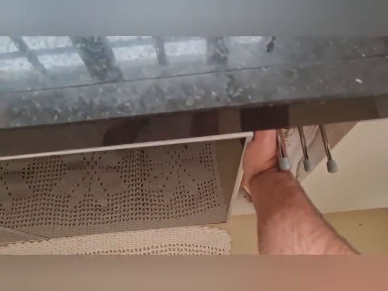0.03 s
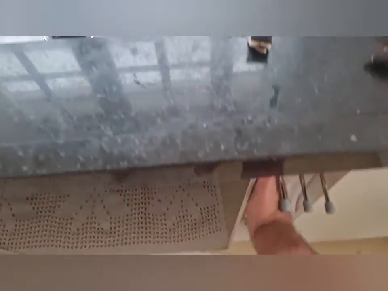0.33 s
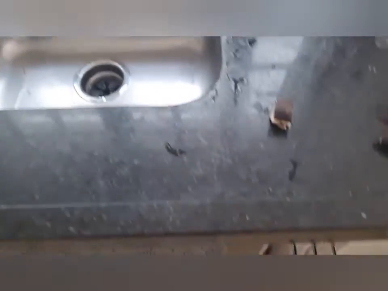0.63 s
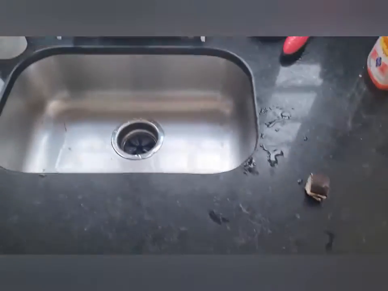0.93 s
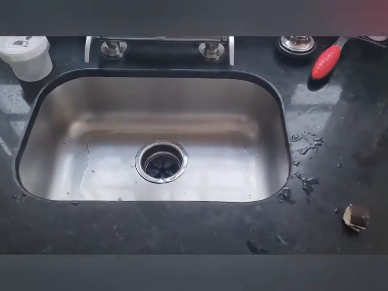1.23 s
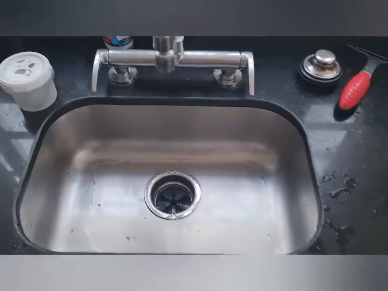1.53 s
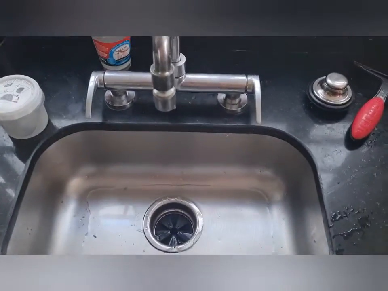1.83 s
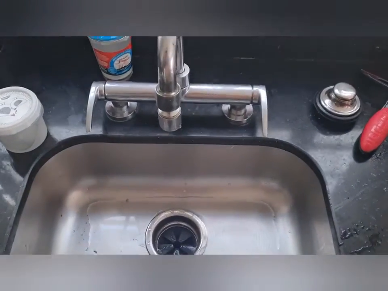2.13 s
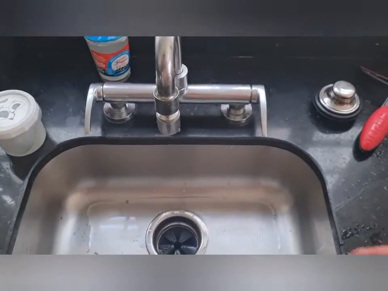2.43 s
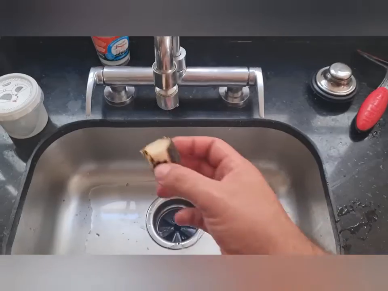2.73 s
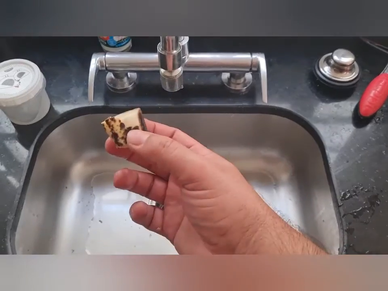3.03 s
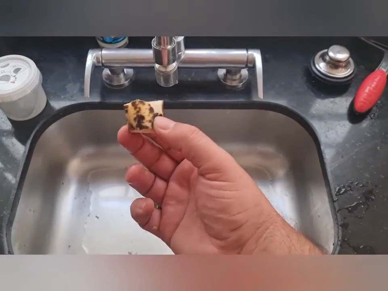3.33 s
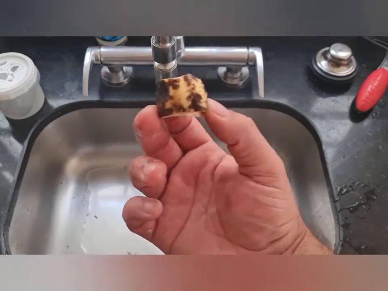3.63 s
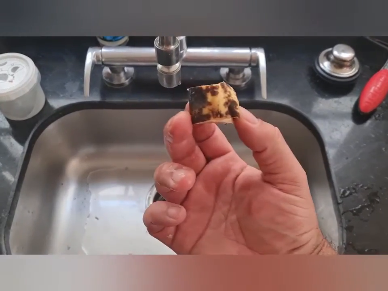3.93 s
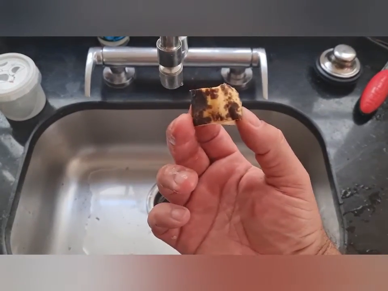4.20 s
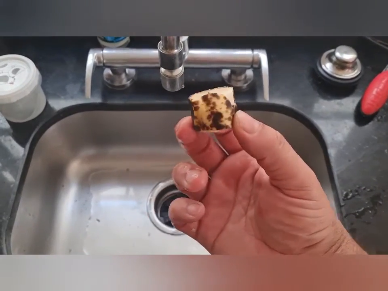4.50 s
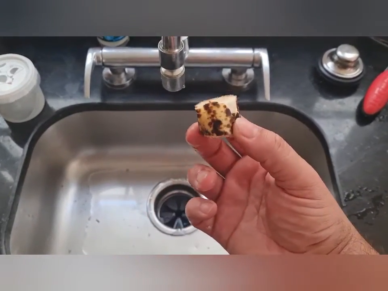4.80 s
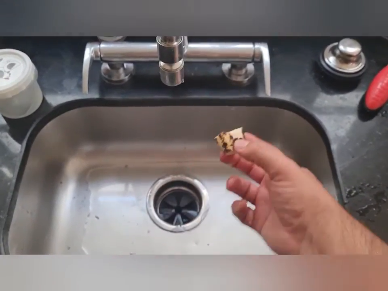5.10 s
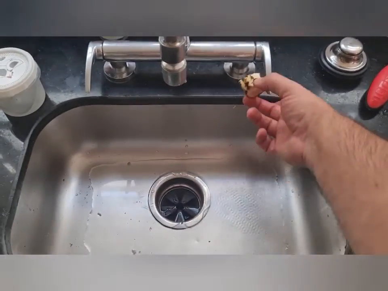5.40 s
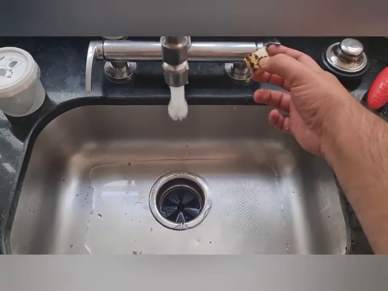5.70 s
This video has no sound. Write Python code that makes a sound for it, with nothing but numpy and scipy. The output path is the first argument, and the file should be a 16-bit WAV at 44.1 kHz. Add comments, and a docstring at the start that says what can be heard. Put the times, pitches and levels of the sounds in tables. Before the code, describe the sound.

In a quiet kitchen, a sink garbage disposal clicks on and jolts into motion with a short rattle. Its motor settles into an even hum and whir while water sloshes inside and droplets hiss through the drain, with light metallic scraping and occasional pings. The close microphone rises over the sink, making the sound clearer, and a soft splash of tap water arrives just at the end.

```python
"""Garbage disposal running empty but wet

Under a steel kitchen sink a switch ticks, and an induction motor shudders up to speed, humming at
twice the mains rate. Its turntable churns water, flings spray at the grinding chamber and scrapes
with a steely ring. The tone opens as the listener clears the rim; at the end tap water hits the basin."""
import sys
import numpy as np
from scipy.fft import rfft, irfft, next_fast_len
from scipy.io import wavfile
from scipy.ndimage import map_coordinates

SR = 44100
rng = np.random.default_rng(int(sys.argv[2]) if len(sys.argv) > 2 else 0)


def int16_out(signal):
    """Quantize to a 16-bit WAV file."""
    q = np.round(np.clip(np.atleast_2d(signal).T, -1, 1) * 32767)
    wavfile.write(sys.argv[1], SR, q.astype(np.int16))


N = 262395

# Room tone. Each row: frequency in Hz, relative level in dB.
ROOM_SPECTRUM = [(18, -56), (30, -10), (247, -4.5), (735, -28), (1780, -27), (2190, -26), (2700, -36),
                 (3980, -31), (15000, -50)]
# Stereo image in the basin. Each row: frequency in Hz, left-right likeness from -1 to 1.
STEREO_LIKENESS = [(60, 0.77), (330, 0.96), (520, 0.54), (950, 0.36), (1200, -0.057), (1700, 0.65),
                   (2100, -0.55), (2750, 0.15), (3100, 0.46), (3900, 0.41), (5050, 0.34), (5500, 0.3),
                   (7200, -0.35), (12500, -0.1), (15000, 0.11)]
# Short echoes that tie left and right together, for a less diffuse sound. Each entry: delay in seconds.
SIDE_ECHOES_S = [.00025, .00055, .0009, .0013, .0017, .0022]
# Colour of both the tap's splash and the switch's tick. Each row: frequency in Hz, relative level in dB.
SPLASH_SPECTRUM = [(25, -18), (70, 5), (300, 1), (900, -5), (1700, -23), (2150, -7), (3100, -2), (3700, -8),
                   (4400, 4), (5200, -1.5), (7000, -1), (8500, -5), (11500, -7), (16000, -18)]

MAINS_HZ, SHAFT_HZ, SWITCH_ON_S = 60.04, 29.25, .075
SHUDDER_AT_S, SHUDDER_RISE_DB_PER_S = 0.27, 139  # the shaking peaks just before full speed
# Magnetic hum, before the starting surge and sag. Each row: time in seconds, level in dB.
HUM_LEVELS = [(0.55, -23), (1.01, -22.5), (1.11, -25), (1.29, -21.5), (1.34, -22), (2.06, -19), (2.14, -18),
              (2.37, -20), (2.48, -19.5), (3.0, -20), (5.46, -19), (5.6, -20.5), (5.78, -18), (5.87, -19)]
# Stator buzz under the starting current. Each row: multiple of the hum's pitch, level in dB.
BUZZ_HARMONICS = [(3, -43), (5, -55), (6, -54)]
# Rotor unbalance tones. Each row: multiple of the shaft rate, level in dB.
SHAFT_TONES = [(2, -60.5), (6, -50), (9, -49), (12, -55)]
# Rattle of the mount. Each row: frequency in Hz, relative level in dB.
MOUNT_SPECTRUM = [(120, 1), (200, 12.5), (633, 1.5), (726, 5), (851, -5), (1060, -43), (1330, -2),
                  (1840, -11), (2500, -18), (3250, -66), (5500, -120)]
# Lugs flying out. Each row: start in seconds, level in dB, pitch in Hz, seconds to fall 60 dB.
LUG_KNOCKS = [(.165, -31, 322, 0.11), (.177, -33, 1306, 0.14), (0.208, -24, 1280, 0.1),
              (0.23, -17, 195, 0.039), (.238, -23.5, 555, 0.14), (.265, -28.5, 830, 0.11),
              (.268, -32, 1337, 0.1), (.291, -27, 600, 0.073)]
# Low ring of the basin. Each row: frequency in Hz, width in Hz, relative level in dB.
BASIN_MODES = [(349, 15, 1), (495, 13, 1), (567, 6.3, 3), (597, 5.2, 3), (726, 29, 6.5), (838, 47, 2)]

WET_AT_S, WET_RISE_S = .12, 0.15  # the turntable picks up the water
RIM_FROM_S, OVER_SINK_S = 1, 1.78  # the listener clears the rim
# Churning water. Each row: frequency in Hz, relative level in dB.
CHURN_SPECTRUM = [(20, -31), (45, -10), (80, -5), (130, 7), (200, 0.5), (260, 1.5), (350, -4), (430, -12),
                  (620, -18), (850, -14), (1400, -11.5), (2100, -18.5), (4000, -54)]
# Colour of the drumming: a dip at 2.1-2.5 kHz, a lift at 2.7 kHz. Each row: frequency in Hz, gain in dB.
DRUMMING_EQ = [(1880, 0), (2080, -6.5), (2450, -3), (2700, 6), (3550, -2.5), (3900, 0.5), (4200, -0.5)]
# Grinding chamber resonances. Each row: frequency in Hz, width in Hz, relative level in dB from above
# the sink, and from behind its rim.
CHAMBER_MODES = [(768, 26, -23.5, -4), (875, 23, -22, 1), (1010, 17, 0.5, -6), (1104, 17, 6.5, 1),
                 (1159, 29, 4, 5), (1221, 30, 2.5, 7), (1344, 43, -26, 6), (1440, 31, -0.5, 4.5),
                 (1685, 23, 4.5, 10.5), (1737.7, 28, 8, 7.5), (1771, 16, 5, 8), (1870, 14, -2, 5),
                 (2727, 130, -9.5, -7.5), (3083, 52, 1, -2.5), (3174, 67, -3, -12), (3436, 124, -6.5, -19),
                 (3670, 110, -11.5, -19), (4230, 186, -3, -7)]
# Turntable resonances, lowest first. Each row: frequency in Hz, width in Hz, relative level in dB from
# above the sink, and from behind its rim.
STEEL_MODES = [(5066, 62, 12.5, 5), (5180, 49, -1, 0), (5290, 38, 3, -12), (5410, 41, -6, -9),
               (5685, 44, -16, -8), (6030, 85, -1, -14), (6500, 63, -3.5, -3), (7240, 130, -17, -5)]
# Ring of the rubbing steel, before the rim shades it. Each row: time in seconds, level in dB.
RING_LEVELS = [(.2, -45), (.8, -31.5), (1.2, -32.5), (1.62, -39.5), (1.8, -36), (2.3, -37.5), (2.7, -34),
               (3.15, -38.5), (3.9, -34.5), (4.4, -36.5), (4.9, -34.5), (5.95, -37.5)]
# The steel catches and pings. Each row: time in seconds, level in dB.
STEEL_CATCHES = [(2.19, -34), (2.735, -33), (3.031, -27.5), (3.865, -28), (3.965, -30), (4.96, -28)]
# Broader rasp of wet steel. Each row: time in seconds, level in dB.
RASP_LEVELS = [(.2, -71), (.7, -54), (1.2, -62), (1.6, -51), (1.9, -43), (2.3, -37.5), (2.75, -45),
               (2.95, -51), (3.6, -88), (4.4, -42.5), (5.1, -42), (5.95, -43)]
# Colour of that rasp. Each row: frequency in Hz, relative level in dB.
RASP_SPECTRUM = [(4800, -56), (5150, -11), (5330, -1), (5480, 0.5), (5750, -11), (6600, -40)]

DROPS_PER_S, DROP_WASH = 9000, 1.1
# Spray at the drain. Each row: time in seconds, relative level in dB, left minus right in dB.
SPRAY_LEVELS = [(.2, -32, 12), (.3, -40, 11.5), (.35, -33.5, 11), (.68, -37, 10), (.87, -35.5, 8),
                (1.65, -34, 5.5), (1.8, -34.5, 5.5), (2.25, -34, 4.5), (2.42, -36, 6), (3, -34.5, 6.5),
                (4.8, -35.5, 7.5), (5.3, -34.5, 4), (5.6, -32.5, 3.5), (5.9, -34, 2.5)]
# Spurts through the drain. Each row: time in seconds, boost in dB.
SPRAY_SPURTS = [(1.93, 2), (3.165, 6), (4.91, -3), (5.57, 3)]
# Hiss of the droplets. Each row: frequency in Hz, relative level in dB.
MIST_SPECTRUM = [(1500, -49), (2400, -7.5), (3500, -5.5), (3850, -5), (4300, 3.5), (4800, -9), (5300, 7),
                 (6700, 7.5), (7350, 10), (8000, 4), (8350, -2.5), (9200, 7), (10050, 2.5), (10650, 8.5),
                 (11500, 3.5), (12300, 6), (13100, 0.5), (15700, 0.5)]
# The listener's move to the sink. Each row: time in seconds, nearness from 0 to 1.
NEARNESS = [(.3, 0.01), (2.3, 0.97), (5.95, .95)]
# Echoes off the drain's collar, left list then right. Each row: delay in ms from afar, and over the sink.
COLLAR_ECHOES = [
    [(.719, .652), (1, .536), (0.14, 0.62)],
    [(1.2, 1), (4, 0.55), (0.56, 0.24)],
]
# Sliding bands of hiss. Each row: starting frequency in Hz, width in Hz, relative level in dB.
HISS_BANDS = [(6280, 270, 5), (8240, 170, 1), (10900, 400, -2)]
# Gulps of water. Each row: time in seconds, level in dB, pitch in Hz, boost to the wall's drumming in dB.
WATER_GULPS = [(.32, -28, 165, -3), (1.1, -33, 172, 1), (1.78, -34.5, 262, 1), (2.14, -39, 253.5, 1),
               (2.52, -43, 262, 0.5), (2.64, -39, 149.5, 0.5), (4.125, -36.5, 184, 1),
               (5.04, -36, 255.7, 0), (5.17, -34.5, 176, -1)]
GULP_HALF_S = 0.036


def amp(db):
    """Decibels to gain."""
    return 10 ** (np.asarray(db) / 20)


def along(points, hz):
    """Read (Hz, value) points on a log frequency axis."""
    freqs, values = np.transpose(points)
    return np.interp(np.log(hz + 1), np.log(freqs + 1), values)


def clock():
    """The time of every sample, in seconds."""
    return np.arange(N) / SR


def curves(rows):
    """An automation curve for each column after the time."""
    times, *columns = np.transpose(rows)
    return [np.interp(clock(), times, column) for column in columns]


def before_after(s):
    """Seconds still to go until s, and seconds gone since."""
    return np.maximum(s - clock(), 0), np.maximum(clock() - s, 0)


def ramp(rise_s, start=SWITCH_ON_S):
    """0 before the start, 1 after rise_s seconds."""
    return np.clip((clock() - start) / rise_s, 0, 1)


def swell(s, half_s):
    """A smooth bump of height 1 at time s."""
    return np.exp(-np.minimum(((clock() - s) / half_s) ** 2, 20))


def burst(start, rise_s, db, fall_db_per_s):
    """An envelope with a quick attack and a steady decay."""
    return amp(db - fall_db_per_s * before_after(start)[1]) * ramp(rise_s, start)


def wobble(rate):
    """A smooth random curve, rate knots a second."""
    return map_coordinates(rng.standard_normal(int(N * rate / SR) + 4), [clock() * rate])


def noise():
    """Two unrelated white noises."""
    return rng.standard_normal((2, N))


def impacts(rate, wash):
    """Tiny random hits, rate a second, on a wash of countless smaller ones."""
    hits = noise() * (rng.random(N) < rate / SR)
    return hits / np.sqrt(np.mean(hits ** 2) + 1e-20) + wash * noise()


def filtered(x, response):
    """Pass x through a frequency response."""
    size = next_fast_len(N + SR // 2)
    return irfft(rfft(x, size) * response(np.fft.rfftfreq(size, 1 / SR)), size)[..., :N]


def shape(spectrum):
    """The response of a broad EQ curve."""
    return lambda hz: amp(along(spectrum, hz))


def body(modes):
    """The response of a set of resonances."""
    return lambda f: sum(amp(db) * 1j * f * width / (hz * hz - f * f + 1j * f * width)
                         for hz, width, db in modes)


def delayed(x, lag_s):
    """x heard a changing number of seconds later."""
    return x[np.clip(np.arange(N) - np.round(lag_s * SR).astype(int), 0, N - 1)]


def panned(pair, left_db):
    """Lean a pair to the left, keeping its mean gain."""
    ratio = amp(left_db)
    return np.array([pair[0] * ratio, pair[1]]) * 2 / (1 + ratio)


def in_basin(pair, response):
    """Colour two unrelated drives and mix them as the basin's reflections do; the middle has rms 1."""
    size = next_fast_len(N + SR // 2, real=True)
    hz = np.fft.rfftfreq(size, 1 / SR)
    first, second = rfft(pair, size) * response(hz)
    spread = np.arccos(np.clip(along(STEREO_LIKENESS, hz), -1, 1)) / 2
    # part of the side signal is the middle, arriving by short echoes
    shared = 0.83 * np.tanh(sum(np.sin(2 * np.pi * hz * s) for s in SIDE_ECHOES_S))
    echoed = 1j * shared * first + np.sqrt(1 - shared ** 2) * second
    mid, side = irfft(np.array([first * np.cos(spread), echoed * np.sin(spread)]), size)[:, :N]
    return np.array([mid + side, mid - side]) / np.std(mid)


def shade():
    """1 while the rim hides the drain, 0 once the listener is over the sink."""
    return 1 - ramp(OVER_SINK_S - RIM_FROM_S, RIM_FROM_S)


def past_rim(drive, modes, response):
    """Drive a set of modes whose balance changes as the listener clears the rim."""
    above = in_basin(drive, response([(hz, width, db) for hz, width, db, _ in modes]))
    behind = in_basin(drive, response([(hz, width, db) for hz, width, _, db in modes]))
    return above + shade() * (behind - above)


def kitchen():
    """A quiet, low bed of room tone."""
    return amp(-52) * in_basin(noise(), shape(ROOM_SPECTRUM))


def switch():
    """The contacts close with a faint tick."""
    tick = burst(start=0.071, rise_s=.002, db=-62, fall_db_per_s=201)
    return tick * in_basin(noise(), shape(SPLASH_SPECTRUM))


def shaft_angle():
    """The rotor reaches speed in about a quarter second, then wavers with the drag of the water."""
    speed_hz = SHAFT_HZ * ramp(0.27) * (1 + 0.0027 * wobble(5))
    return 2 * np.pi * np.cumsum(speed_hz) / SR


def motor(angle):
    """The stator pulls twice per mains cycle, hardest while starting; unbalance adds weak shaft tones."""
    hum_db, = curves(HUM_LEVELS)
    # the hum sags under the shudder, peaks as the rotor reaches speed, and settles
    sag_db = 5 * swell(0.264, half_s=0.022)
    before, after = before_after(0.33)
    surge_db = 9 * np.maximum(1 - before / 0.32 - after / 0.22, 0)
    stereo_phase = np.outer([.5, -.5], .15 * (1 + 0.095 * wobble(1.3)))  # sides slightly out of step
    pull = 2 * np.pi * 2 * MAINS_HZ * clock() + 0.075 * wobble(27) + stereo_phase
    hum_gain = amp(hum_db + surge_db - sag_db + 0.42 * wobble(30)) * ramp(0.11)
    hum = hum_gain * (np.sin(pull) + amp(-35) * np.sin(2 * pull))
    tones = sum(amp(db + 3.2 * wobble(12)) * np.sin(k * angle + 0.8 * wobble(9)) for k, db in SHAFT_TONES)
    buzz = sum(amp(db + 1.7 * wobble(21)) * np.sin(k * pull) for k, db in BUZZ_HARMONICS)
    starting = ramp(0.033) * (1 - ramp(0.083, SHUDDER_AT_S))
    return panned(np.sqrt(2) * (hum + buzz * starting + tones * ramp(0.97)), left_db=-.5)


def shudder(hold_s=.055, peak_db=-29.5, first_shake_db=-43.5, fall_db_per_s=190):
    """Starting torque shakes the mount from the moment the switch closes, holding its peak briefly."""
    before, after = np.maximum(np.array(before_after(SHUDDER_AT_S)) - hold_s / 2, 0)
    build_db = np.maximum(peak_db - SHUDDER_RISE_DB_PER_S * before, first_shake_db)
    shake = amp(build_db - fall_db_per_s * after) * ramp(.02)
    return shake * in_basin(impacts(rate=490, wash=0.99), shape(MOUNT_SPECTRUM))


def basin(jolt_db=27, fall_db_per_s=81):
    """The start jolts the steel basin, and the motor's shaking keeps it ringing faintly."""
    before, after = before_after(SHUDDER_AT_S)
    jolt = amp(jolt_db - SHUDDER_RISE_DB_PER_S * before - fall_db_per_s * after)
    return amp(-64) * (1 + jolt) * in_basin(noise(), body(BASIN_MODES)) * ramp(0.15)


def chamber(angle, slosh):
    """Water churns low in the housing and drums on its wall as each of two lugs sweeps by."""
    hum_db, = curves(HUM_LEVELS)
    swell_db = hum_db - np.median(hum_db)  # both layers partly ride the hum's level
    turbulence = noise() * amp(3.3 * np.tanh(wobble(20)))
    churn = amp(-40 + 0.58 * swell_db) * in_basin(turbulence, shape(CHURN_SPECTRUM))
    slap_db = sum(db * swell(s, GULP_HALF_S) for s, _, _, db in WATER_GULPS)
    drops = impacts(rate=3500, wash=0.96)
    force = amp(slap_db + 0.5 * slosh + np.sin(2 * angle) + 1.8 * wobble(70))
    drumming = filtered(drops * force, shape(DRUMMING_EQ))
    whir = amp(-38 + 0.59 * swell_db) * past_rim(drumming, CHAMBER_MODES, body)
    return panned(churn, left_db=-1.5) + whir


def plate(modes, cutoff_hz=4985):
    """The response of a steel plate, which hardly radiates below its first mode."""
    return lambda hz: body(modes)(hz) / np.sqrt(1 + (cutoff_hz / np.maximum(hz, cutoff_hz / 2)) ** 70)


def scrape(slosh, rim_loss_db=10):
    """Steel rubs in uneven bursts: the turntable rings, pings where it catches, and rasps."""
    ring_db, = curves(RING_LEVELS)
    rasp_db, = curves(RASP_LEVELS)
    pressure = amp(0.5 * slosh + 0.95 * wobble(45) + 0.58 * wobble(180))
    ring = past_rim(impacts(rate=2600, wash=0.64) * pressure, STEEL_MODES, plate)
    playhead = np.arange(N) + .00003 * SR * wobble(22)  # the pitch wavers
    ring = np.array([map_coordinates(side, [playhead]) for side in ring])
    ring *= amp(ring_db - rim_loss_db * shade())
    catches = sum(amp(db) * swell(s, half_s=0.0079) for s, db in STEEL_CATCHES)
    pings = np.sqrt(2) * catches * np.sin(2 * np.pi * STEEL_MODES[0][0] * playhead / SR)
    rasp = amp(rasp_db) * in_basin(impacts(rate=1600, wash=0.68) * pressure, shape(RASP_SPECTRUM))
    return panned(ring + pings + rasp, left_db=11)


def reflected(pair, count, longest_s=.006, drift_s=.00008):
    """Short echoes shift as the listener nears, sweeping the colour of the hiss; wall echoes drift."""
    nearness, = curves(NEARNESS)
    out = []
    for side, echoes in zip(pair, COLLAR_ECHOES):
        collar = sum(delayed(side, (far + (near - far) * nearness) / 1000) for far, near in echoes)
        wall_lags = rng.uniform(longest_s / 10, longest_s, count)
        walls = sum(delayed(side, s + drift_s * wobble(1.2)) for s in wall_lags)
        out.append(side + amp(-15) * collar + amp(-7.5) * walls)
    return np.array(out) * np.std(pair) / np.std(out)


def spray(angle, slosh):
    """Flung droplets hiss through the drain; the middle of the hiss leans furthest left."""
    spray_db, left_db = curves(SPRAY_LEVELS)
    spurt_db = sum(db * swell(s, half_s=0.0063) for s, db in SPRAY_SPURTS)
    throw = amp(spurt_db + 0.55 * slosh + 0.15 * np.sin(angle) + 1.44 * wobble(150))
    mist = in_basin(impacts(DROPS_PER_S, DROP_WASH) * throw, shape(MIST_SPECTRUM))
    mist = amp(spray_db - 1.45) * reflected(mist, count=6)
    # Each row: frequency in Hz, extra left minus right in dB.
    lean = [(2500, -17), (4300, 1.5), (7200, 1.5), (9500, -3.0), (11000, -3.5), (13000, -7.0)]
    mist = filtered(mist, lambda hz: amp(np.outer([.5, -.5], along(lean, hz))))
    return panned(mist, left_db)


def sliding_hiss(rise_per_s=.13, fall_db_per_s=10):
    """Bright bands in the hiss slide upward and fade while the listener swings towards the sink."""
    speed = 1 + rise_per_s * np.minimum(clock(), RIM_FROM_S)
    bands = in_basin(noise(), body(HISS_BANDS))
    sliding = np.array([map_coordinates(side, [np.cumsum(speed)], mode="wrap") for side in bands])
    fade = amp(-36 - fall_db_per_s * clock()) * shade() * ramp(0.39, WET_AT_S)
    return panned(fade * sliding, left_db=13)


def lug_knocks(attack_s=0.002):
    """The swinging lugs fly outward with short pitched knocks."""
    out = np.zeros(N)
    for start, db, hz, t60 in LUG_KNOCKS:
        _, age = before_after(start)
        envelope = amp(db - 60 * np.minimum(age / t60, 10)) * (1 - np.exp(-age / attack_s))
        out += envelope * np.sin(2 * np.pi * hz * age)
    return out


def gulps():
    """Pockets of water slap the housing with a short low boom."""
    return sum(amp(db) * swell(s, GULP_HALF_S) * np.sin(2 * np.pi * hz * clock() + 0.5 * wobble(30))
               for s, db, hz, _ in WATER_GULPS)


def tap():
    """The tap's aerated stream lands on the steel with a soft hiss."""
    landing = burst(start=5.888, rise_s=0.01, db=-30, fall_db_per_s=40)
    splash = in_basin(impacts(DROPS_PER_S, DROP_WASH), shape(SPLASH_SPECTRUM))
    return panned(landing * splash, left_db=2)


def scene():
    """One rotor and one sloshing load tie the disposal's layers together, over a quiet kitchen."""
    angle, slosh = shaft_angle(), wobble(32)
    wet = chamber(angle, slosh) + scrape(slosh) + spray(angle, slosh) + sliding_hiss() + gulps()
    room = kitchen()
    machine = switch() + motor(angle) + shudder() + basin() + lug_knocks()
    return room + machine + wet * ramp(WET_RISE_S, WET_AT_S) + tap()


def record(dry):
    """A brick-wall low-pass takes off the very top."""
    return filtered(dry, lambda hz: hz < 15760)


dry = scene()
out = record(dry)
int16_out(out)
```